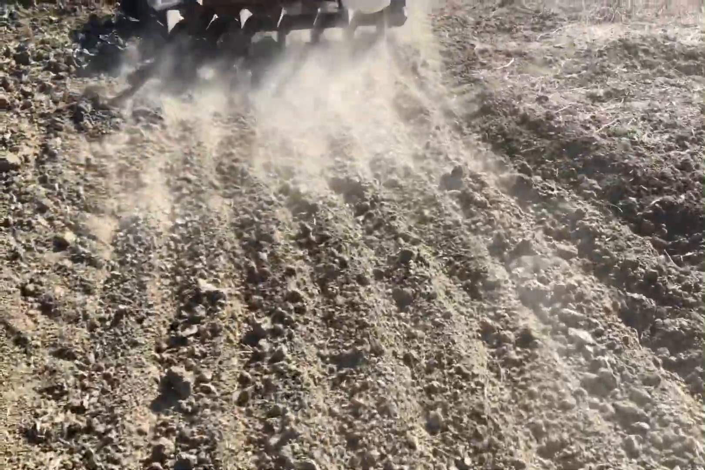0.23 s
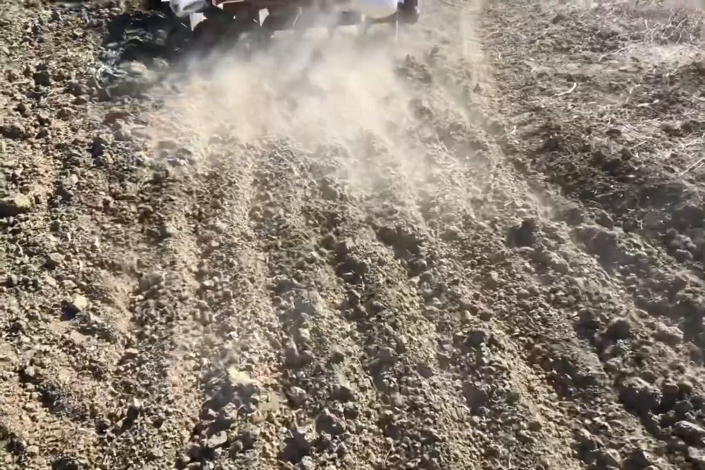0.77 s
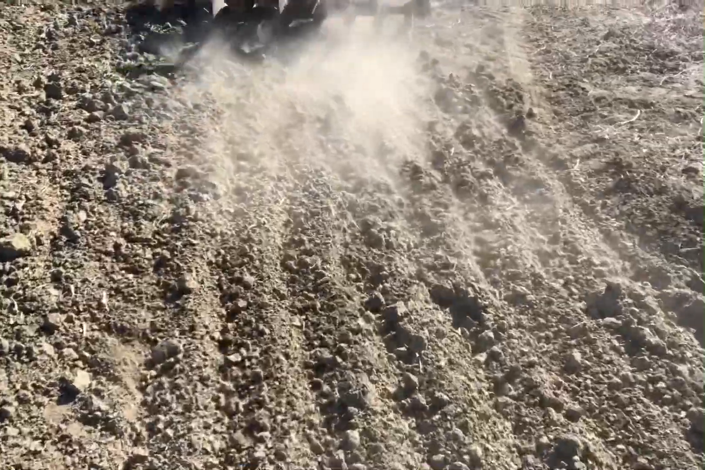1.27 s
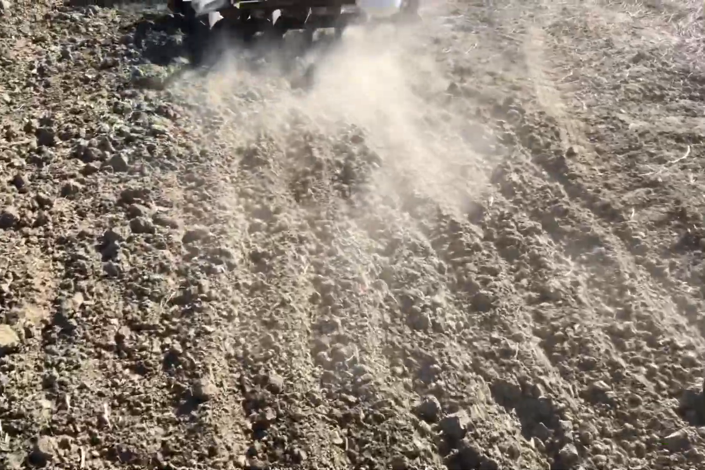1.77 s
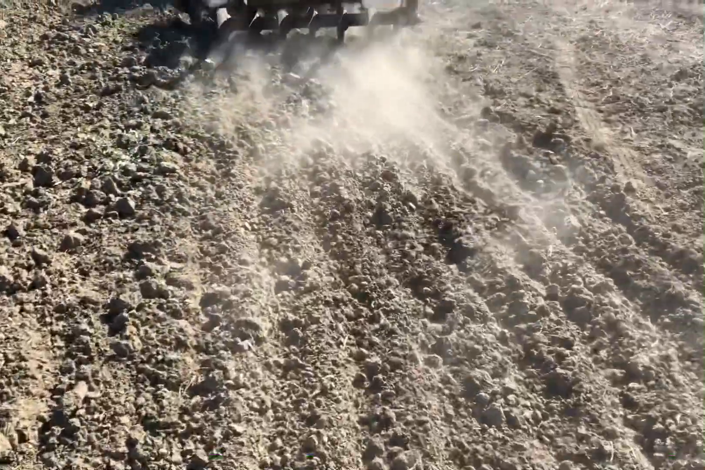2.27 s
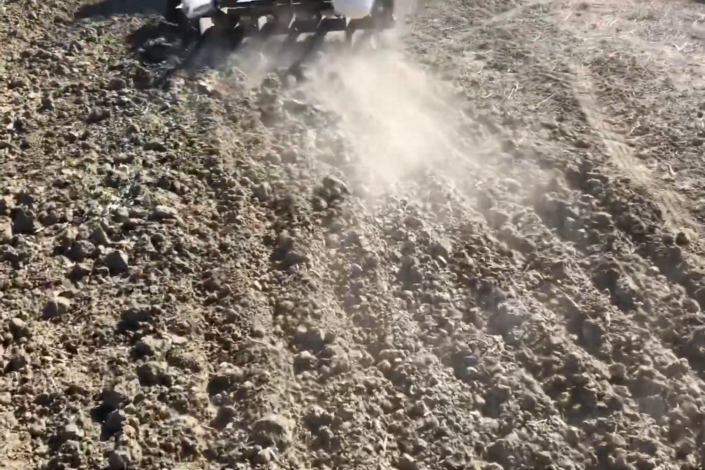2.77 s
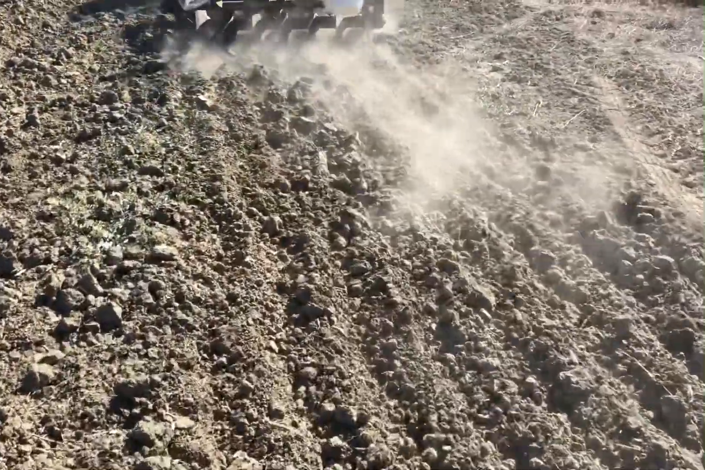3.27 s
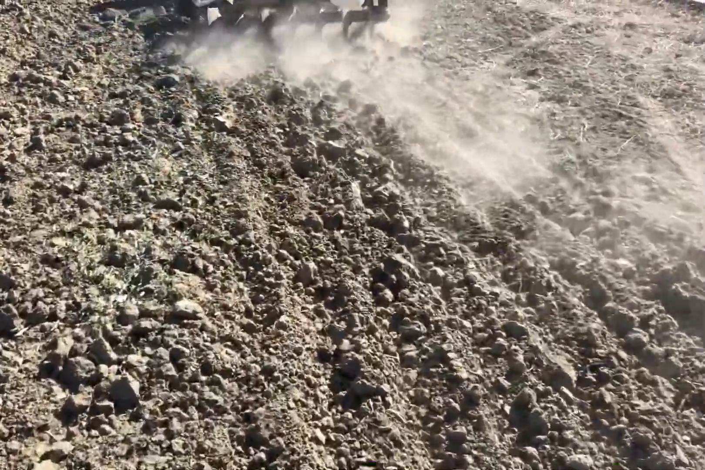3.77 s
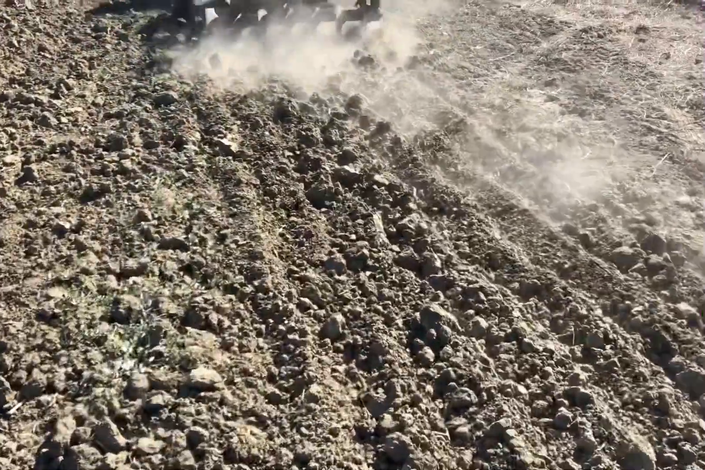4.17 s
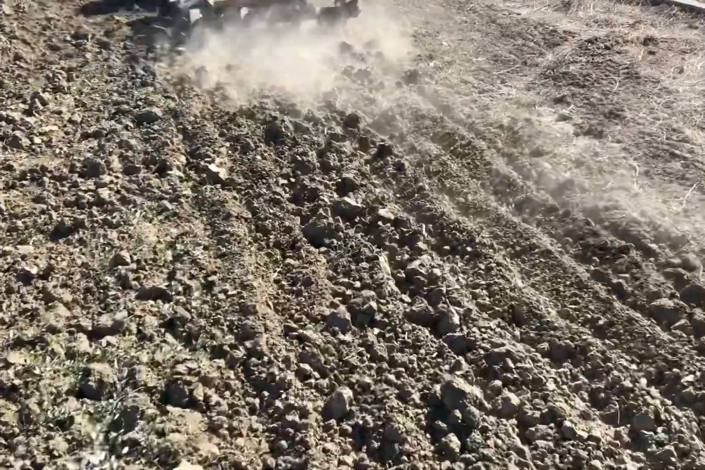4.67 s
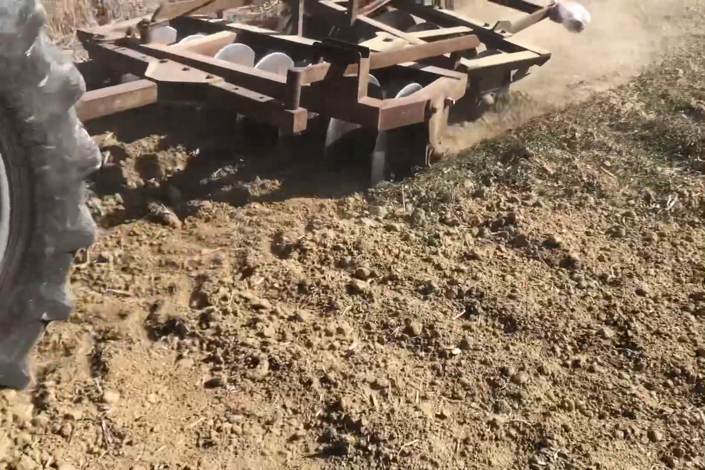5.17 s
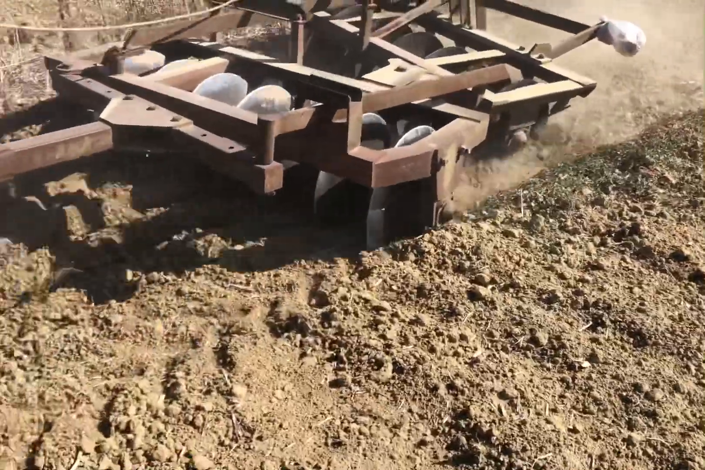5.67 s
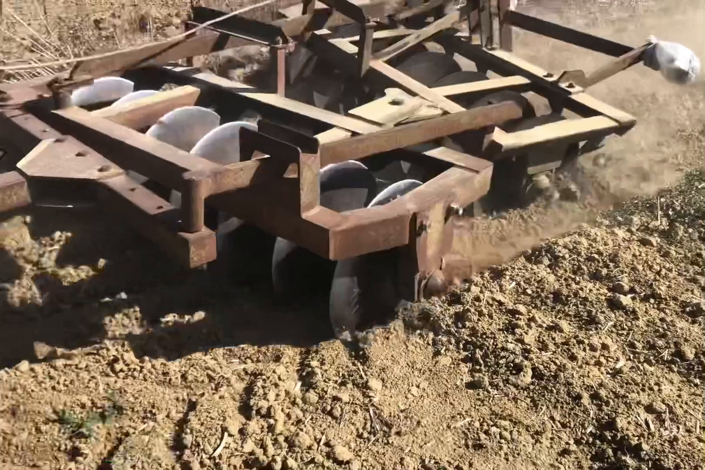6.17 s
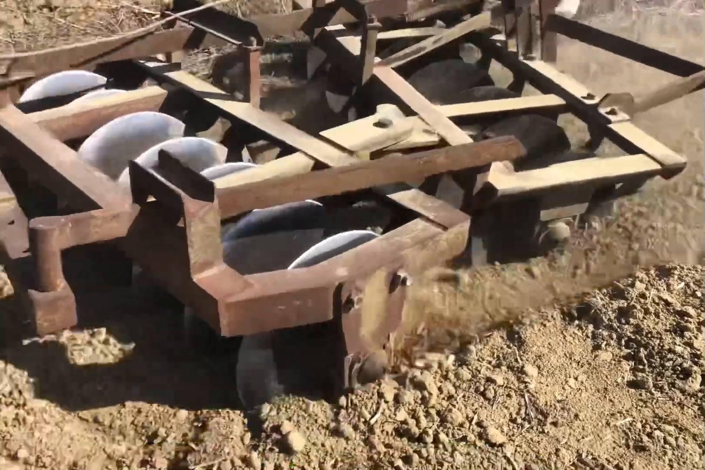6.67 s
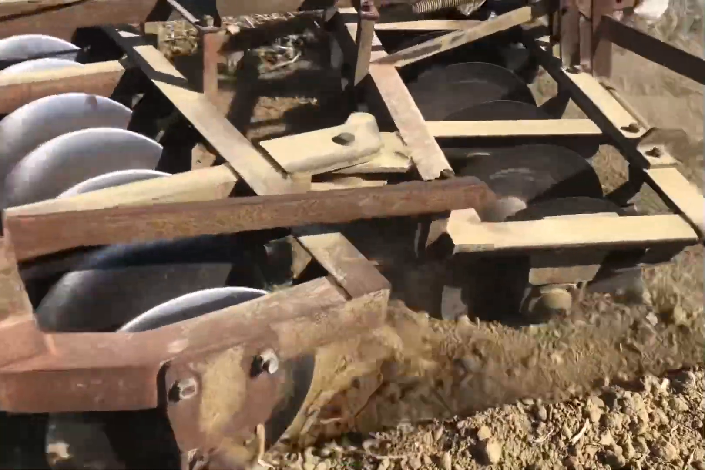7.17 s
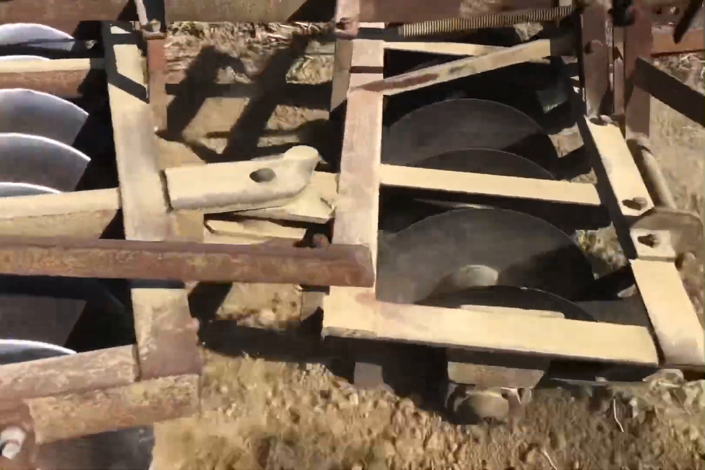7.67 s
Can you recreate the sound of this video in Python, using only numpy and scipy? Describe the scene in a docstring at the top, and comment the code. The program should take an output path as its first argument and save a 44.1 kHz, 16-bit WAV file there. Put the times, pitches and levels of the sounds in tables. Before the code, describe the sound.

Distant tractor drone with crumbling soil cuts to a loud, close engine moving away as its harrow crunches through clods and stones.

```python
"""A dull diesel drone, with soil crumbling and stones knocking on steel: a four-cylinder tractor pulls a
disc harrow through dry clods, heard from far behind. Then we are suddenly on the verge, where the loud
engine clatters, whines and moves off while the harrow rolls up, squeaks and hits a stone.
Exhaust, clatter and gears are locked to the crankshaft; the soil is a spray of tiny cracks,
and each stone sets the discs ringing."""
import sys
import numpy as np
from scipy import signal
from scipy.fft import rfft, irfft, next_fast_len
from scipy.io import wavfile

SR = 44100
rng = np.random.default_rng(int(sys.argv[2]) if len(sys.argv) > 2 else 0)


def materialize(psi):
    """Save the field psi as 16-bit PCM at rate SR to the path in sys.argv[1].

    A 1-D psi becomes a single channel; in a 2-D psi each row is a channel.
    """
    bounded = np.clip(np.atleast_2d(psi).T, -1, 1)
    quanta = np.round(bounded * 32767).astype(np.int16)
    wavfile.write(sys.argv[1], SR, quanta)


N = 349272
TIME = np.arange(N) / SR
CUT_S, CROSSFADE_S = 4.773, 0.016   # the cut from behind the harrow to the verge
ENGINE_PASS_S, PIPE_PASS_S = 4.875, 4.98   # engine and exhaust pipe are nearest the verge
AWAY_DB = 0.27 * (CUT_S / 2 - TIME)   # slow fade as the tractor draws away, heard from behind
LEAVING = np.interp(TIME, [5.6, 6.9], [0, 1])   # morph from the close engine tone to the far one


# EQ of the rushing gas: f/Hz, level/dB
GAS_EQ = [(45, -16), (70, 0.5), (110, -4.5), (160, -4.5), (215, -1), (270, -18.5), (350, -15.5), (500, -32)]
def exhaust(cycle, orders, boom_db, octave_db, rumble_db, gas_db, waver):
    """Four firings a cycle make the boom; unequal cylinders add the tones between, gas a rumble."""
    boom = unit_rms(crank_tones(cycle, orders[:7], waver * .3))
    octave = unit_rms(crank_tones(cycle, orders[7:8], waver * .3))
    upper = unit_rms(crank_tones(cycle, orders[8:], waver))
    puffs = rng.standard_normal(N) * (1 + .5 * np.cos(8 * np.pi * cycle))
    rumble = from_db(-0.5) * upper + from_db(gas_db) * equalise(puffs, GAS_EQ)
    return from_db(boom_db) * boom + from_db(octave_db) * octave + from_db(rumble_db) * rumble


# Exhaust partials from behind: multiple of the cycle rate, relative level/dB
DULL_PARTIALS = [(1, -46), (2, -37), (3, -30), (4, -3), (5, -59), (6, -32), (7, -12), (8, -3), (9, -16.5),
                 (10, -49), (11, -8.5), (12, -17.5), (13, -21.5), (14, -17), (15, -27.5), (16, -21),
                 (17, -21.5), (18, -40), (19, -35), (20, -26)]
def exhaust_behind(cycle, load_db):
    """A distant drone that ducks whenever the load eases."""
    return exhaust(cycle, DULL_PARTIALS, boom_db=-30 + 0.77 * load_db, octave_db=-33 + 0.98 * load_db,
                   rumble_db=-38.5 + 1.1 * load_db + AWAY_DB, gas_db=-1.5, waver=0.21)


# Exhaust partials from the verge, close and then leaving: multiple of the cycle rate, relative level/dB
CLOSE_PARTIALS = [(1, -49), (2, -40), (3, -31), (4, 0), (5, -20), (6, -25), (7, -11.5), (8, -8.5), (9, -18),
                  (10, -11.5), (11, -18), (12, -19.5), (13, -20), (14, -26), (15, -27), (16, -28), (17, -9),
                  (18, -29), (19, -15), (20, -19)]
LEAVING_PARTIALS = [(1, -45), (2, -40), (3, -24), (4, 1), (5, -23), (6, -36), (7, -9.5), (8, -5.5),
                    (9, -18), (10, -17), (11, -5), (12, -9), (13, -29), (14, -29), (15, -27), (16, -21.5),
                    (17, -23.5), (18, -14), (19, -24), (20, -19)]
# Fader for the octave of the firing tone, which drops out and returns: t/s, level/dB
OCTAVE_FADER = [(4.92, -25), (5.05, -40), (5.2, -28), (5.35, -42), (5.5, -43.5), (5.82, -29.5), (6.4, -30),
                (7.65, -30)]
def exhaust_beside(cycle):
    """The pipe booms past, and its partials shift in balance as it moves away."""
    orders = [(order, close_db + LEAVING * (far_db - close_db))
              for (order, close_db), (_, far_db) in zip(CLOSE_PARTIALS, LEAVING_PARTIALS)]
    boom_db = pass_by(PIPE_PASS_S, nearest_db=-14, falloff=1.05)
    rumble_db = pass_by(PIPE_PASS_S, nearest_db=-28.5, falloff=0.39)
    return exhaust(cycle, orders, boom_db, automation(OCTAVE_FADER), rumble_db, gas_db=-2.5, waver=0.14)


# Accent of each cylinder, in firing order: level/dB
CYLINDER_ACCENTS = [-0.18, 0.91, -0.56, 0.082]
def clatter(cycle, looped_share, depth_db):
    """Combustion, valves and injectors: noise that swells at each firing, part looped every cycle."""
    loop = rng.standard_normal(int(TIME[-1] * SR / cycle[-1]))
    looped = loop[(cycle % 1 * len(loop)).astype(int)]
    firing = 4 * cycle
    swell = np.sin(np.pi * (firing % 1) ** 0.66) ** 2
    accent_db = np.array(CYLINDER_ACCENTS)[firing.astype(int) % 4]
    pulse = unit_rms(from_db(swell * (depth_db + accent_db)))
    return blend(rng.standard_normal(N), looped, looped_share) * pulse


# EQ of the distant clatter: f/Hz, level/dB
DULL_CLATTER_EQ = [(180, -28), (300, -8), (337, -15.5), (417, -4), (458, -8), (547, -5), (601, -3.5),
                   (668, -6.5), (1190, -8.5), (1400, -10.5), (1540, -8), (1770, -10), (3730, -27.5),
                   (5000, -31), (6500, -59), (11000, -120)]
# Resonances of the tractor's body: f/Hz, width/Hz, boost/dB
BODY_PEAKS = [(613, 47, 3), (900, 34, 4.5), (1263, 170, 3.5), (1710, 140, -2.5)]
def clatter_behind(cycle):
    """Muffled midrange: engine clatter and breaking clods, coloured by the body."""
    engine = clatter(cycle, looped_share=0.053, depth_db=2.0)
    clods = crumbs(per_s=1200, spread_db=3.8, clump_db=4)
    return equalise(blend(engine, clods, share=0.23), DULL_CLATTER_EQ, BODY_PEAKS, ripple_db=1.2)


# EQ of the close clatter: f/Hz, level/dB
CLOSE_CLATTER_EQ = [(150, -2.5), (250, -4.5), (275, -2.5), (326, -10), (441, -4.5), (549, -6.5),
                    (627, -3.5), (751, -5.5), (1260, -8.5), (1650, -8), (1860, -7), (2200, -13),
                    (2770, -13.5), (3250, -26.5), (4500, -32.5), (5850, -32), (9900, -120)]
# Ringing engine panels: f/Hz, width/Hz, boost/dB
PANEL_PEAKS = [(2710, 110, 2), (3066, 105, 5), (4000, 120, 1.5), (4930, 70, 7), (5440, 240, 5),
               (6300, 99, 0.5), (7060, 340, 1.5)]
def clatter_beside(cycle):
    """Close clatter rings body and panels; more clods join in as the discs come near."""
    engine = clatter(cycle, looped_share=0.19, depth_db=2.0)
    clods = crumbs(per_s=1600, spread_db=2.8, clump_db=3.2)
    clod_share = 0.29 * np.interp(TIME, [5.2, 6.2, TIME[-1]], [.1, .5, .7])
    return equalise(blend(engine, clods, clod_share), CLOSE_CLATTER_EQ, BODY_PEAKS + PANEL_PEAKS, 2.2)


# Gear and pump tones: multiple of the cycle rate, relative level/dB
GEAR_PARTIALS = [(17, -11), (22, -19), (32, -22.5), (38, -21), (40, -22), (44, -23), (56, -26), (60, -18.5),
                 (64, -17.5), (112, -24), (168, -38)]
def whine(cycle):
    """Gears and pumps sing with the crankshaft, softer as the tractor leaves."""
    return from_db(0.5 - 2.7 * LEAVING) * crank_tones(cycle, GEAR_PARTIALS, waver=0.06)


# Modes of the valve cover: f/Hz, level/dB, t60/s
COVER_MODES = [(2820, 10, 0.015), (5200, -12, .025), (5760, -3, .018), (6350, 2.5, .025)]
# EQ of the engine's metallic top end: f/Hz, level/dB
METAL_EQ = [(1940, -25), (3300, -7), (3910, 1), (4610, -5.5), (5530, -2), (7570, -5.5), (10900, -7),
            (15700, -16.5)]
def ticking(cycle):
    """Tappets tick into the valve cover over bright clatter; one is slack and hits harder."""
    metal = equalise(clatter(cycle, looped_share=.15, depth_db=4.5), METAL_EQ, PANEL_PEAKS, 1.9)
    firing = (4 * cycle).astype(int)
    strength_db = np.where(firing % 4 == 1, 0, -7) + 5.3 * rng.uniform(-1, 1, N)
    ticks = np.diff(firing, prepend=0) * from_db(strength_db)
    cover = sum(ring(ticks * from_db(db + 3.0 * np.tanh(drift(30))), hz, t60)
                for hz, db, t60 in COVER_MODES)
    return blend(metal, cover, share=0.18 * (1 - LEAVING))


def crumbs(per_s, spread_db, clump_db):
    """Dry clods break in clumps of tiny cracks of very unequal size."""
    cracks = rng.random(N) < per_s * from_db(clump_db * drift(25)) / SR
    size_db = spread_db * np.minimum(rng.exponential(1, N), 4)
    return cracks * from_db(size_db) * rng.choice([-1, 1], N)


# EQ of the distant soil hiss: f/Hz, level/dB
FAR_SOIL_EQ = [(2060, -2), (3500, -2.5), (5900, -9.5), (8660, -9), (10700, -12), (12400, -16.5),
               (15100, -20), (15700, -17)]
def soil_behind(cycle):
    """Crumbling soil and the top of the clatter make a hiss that swells just before the cut."""
    swell_db = 11.5 * (np.clip(TIME, 4.09, CUT_S) - 4.09)
    engine = clatter(cycle, looped_share=.02, depth_db=3.0)
    hiss = blend(engine, crumbs(per_s=2500, spread_db=3.2, clump_db=3), share=0.29)
    return from_db(-45.5 + AWAY_DB + swell_db) * equalise(hiss, FAR_SOIL_EQ, ripple_db=2.0)


# EQ of the close soil: f/Hz, level/dB
CLOSE_SOIL_EQ = [(1940, -42), (3300, 1.5), (4550, -2.5), (5460, -2.5), (7720, -4.5), (10600, -4.5),
                 (12300, -12), (15700, -11)]
def soil_beside():
    """Dense, steady crumbling under the discs, uncovered as the engine fades."""
    cracks = crumbs(per_s=9000, spread_db=1.8, clump_db=2.5)
    return from_db(-37) * equalise(cracks, CLOSE_SOIL_EQ, ripple_db=3.3)


# Stones and clods hitting the harrow: t/s, relative level/dB, top of the crunch f/Hz
HITS = [(.283, -31, 2000), (.723, -29.5, 4000), (1.111, -31.5, 7500), (1.570, -28.5, 3000),
        (2.076, -29.5, 4000), (2.21, -32, 2800), (2.425, -29.5, 3960), (2.822, -31, 3500),
        (3.832, -34, 2500), (4.023, -32.5, 4400), (4.251, -30.5, 3500), (6.693, -29, 9000),
        (6.928, -21, 3170), (7.714, -14.5, 13000), (7.738, -11, 12100), (7.76, -16.5, 900),
        (7.793, -17, 3100), (7.851, -14, 4050), (7.86, -16.5, 1110)]
# Modes of the discs and frame: f/Hz, level/dB, t60/s
STEEL_MODES = [(629, 6.5, 0.052), (1320, 2.5, 0.18), (1940, 0, 0.23), (2460, -3.5, 0.13), (3100, -5, 0.11),
               (3320, -3, 0.14), (3860, -6, 0.24), (4480, -3, 0.23), (6000, -4, 0.1), (6820, 1, .14),
               (7800, -3, .12), (11000, -9, .16)]
def knocks(graze_s=.006, graze_db=-2.5, crunch_t60_s=0.078, spread_db=3.5):
    """A stone grazes a disc, strikes it full on and sets it ringing; soft clods sound duller."""
    out = np.zeros(N)
    for start_s, db, top_hz in HITS:
        start = int(start_s * SR)
        age = TIME[:min(N - start, SR // 4)]
        band = signal.butter(4, [250 + 0.05 * top_hz, top_hz], "band", fs=SR, output="sos")
        grit = unit_rms(signal.sosfilt(band, rng.standard_normal(len(age))))
        attack = 1 - np.exp(-age / 0.0013)
        grazing = age < graze_s
        decay_db = 60 * np.where(grazing, age, age - graze_s) / crunch_t60_s
        crunch = grit * attack * from_db(db + graze_db * grazing - decay_db)
        # each stone meets another spot and favours other modes
        steel = sum(from_db(mode_db + spread_db * rng.uniform(-0.73, 1)) * ring(crunch, hz, t60)
                    for hz, mode_db, t60 in STEEL_MODES)
        out[start:start + len(age)] += from_db(-4.5) * crunch + from_db(-47) * steel
    return out


def rattle(per_s):
    """Loose harrow joints touch at random; the contact chokes the steel's lower modes."""
    touches = (rng.random(N) < per_s / SR) * rng.uniform(0.23, 1, N)
    return unit_rms(sum(ring(touches * rng.standard_normal(N) * from_db(db) / hz, hz, t60 * 0.13)
                        for hz, db, t60 in STEEL_MODES[:7]))


def thump(at_s=5.725):
    """A heavy, quickly damped jolt of the drawbar."""
    click = np.zeros(N)
    click[int(at_s * SR)] = from_db(-7.5)
    return (ring(click, hz=172, t60=0.104) - from_db(-10) * ring(click, hz=250, t60=0.12)
            + from_db(-6) * ring(click, hz=363, t60=0.1))


# Bearing squeaks: peak t/s, level/dB, length/s
SQUEAK_CUES = [(1.25, -59, .05), (2.81, -50, .03), (6.025, -34, .036), (6.945, -43, .04),
               (7.062, -46, .025), (7.227, -40, .016), (7.352, -45, .018), (7.44, -46, .02),
               (7.832, -41, 0.046)]
def squeaks(pitch_hz=10300):
    """A dry disc bearing sticks and slips in short, thin, unsteady whistles."""
    out = np.zeros(N)
    wobble = np.cumsum(45 * drift(120)) / SR
    whistle = np.sqrt(2) * np.sin(2 * np.pi * (pitch_hz * TIME + wobble))
    for peak_s, db, length_s in SQUEAK_CUES:
        near = np.abs(TIME - peak_s) < 2 * length_s
        swell = np.exp(-2 * ((TIME[near] - peak_s) / length_s) ** 2)
        out[near] += from_db(db) * swell * whistle[near]
    return out


def crank_tones(cycle, orders, waver):
    """Tones locked to the crankshaft, each wavering a little in strength and phase."""
    out = np.zeros(N)
    for order, db in orders:
        phase = 2 * np.pi * (order * cycle + rng.random()) + waver * drift(1.2)
        out += from_db(db) * (1 + waver * drift(3.7)) * np.sqrt(2) * np.sin(phase)
    return out


def pass_by(nearest_s, nearest_db, falloff, speed_m_per_s=1.906, gap_m=1.427):
    """Level in dB of a source driving straight past; gain falls as distance to the power falloff."""
    distance_m = np.hypot(gap_m, speed_m_per_s * (TIME - nearest_s))
    return nearest_db - 20 * falloff * np.log10(distance_m / gap_m)


def equalise(x, curve, peaks=(), ripple_db=0):
    """An EQ curve with steep skirts, resonant peaks and a ripple of many small modes; rms 1."""
    size = next_fast_len(N + 4096)
    hz = np.maximum(np.arange(size // 2 + 1) * SR / size, 1)
    points_hz, levels_db = np.transpose(curve)
    octaves_outside = np.abs(np.log2(hz / np.clip(hz, points_hz[0], points_hz[-1])))
    db = np.interp(np.log(hz), np.log(points_hz), levels_db) - 36 * octaves_outside
    for centre_hz, width_hz, boost_db in peaks:
        db += boost_db / (1 + (2 * (hz - centre_hz) / width_hz) ** 2)
    modes_hz = np.arange(1500, SR / 2, 45)
    db += ripple_db * np.interp(hz, modes_hz, rng.standard_normal(len(modes_hz)), left=0)
    return unit_rms(irfft(rfft(x, size) * from_db(db), size)[:N])


def ring(x, hz, t60):
    """One mode: a unit click starts a decaying sine of height 1."""
    radius, angle = from_db(-60 / (t60 * SR)), 2 * np.pi * hz / SR
    return signal.lfilter([0, np.sin(angle)], [1, -2 * radius * np.cos(angle), radius ** 2], x + 1e-18)


def drift(rate):
    """Smooth random modulation that changes about rate times a second; rms 1."""
    pole = np.exp(-80 * np.pi * rate / SR)
    slow = signal.lfilter([1], [1, -2 * pole, pole ** 2], rng.standard_normal(N // 40 + 2002))[2000:]
    return np.interp(np.arange(N) / 40, np.arange(len(slow)), unit_rms(slow))


def blend(a, b, share):
    """Equal-power mix; share is b's part of the power."""
    return np.sqrt(1 - share) * unit_rms(a) + np.sqrt(share) * unit_rms(b)


def automation(points):
    """Straight ramps between (time, value) points."""
    return np.interp(TIME, *np.transpose(points))


def from_db(db):
    """Decibels to gain."""
    return 10 ** (np.asarray(db) / 20)


def unit_rms(x):
    """Scale to unit power."""
    return x / np.sqrt(np.mean(x ** 2) + 1e-20)


def behind(cycle, load_db):
    """The far mix: dull engine, faint rattle, soil on top."""
    clatter_db = -37.5 + AWAY_DB + 0.83 * drift(3.2)
    drone = exhaust_behind(cycle, load_db)
    machine = clatter_behind(cycle) + from_db(-19.5) * rattle(per_s=13)
    return drone + from_db(clatter_db) * machine + soil_behind(cycle)


def beside(cycle):
    """The verge mix: the ticking fades fastest as the engine passes, and the soil stays."""
    clatter_db = pass_by(ENGINE_PASS_S, nearest_db=-18.5, falloff=0.91)
    ticking_db = pass_by(ENGINE_PASS_S, nearest_db=-25.5, falloff=2.07)
    drone = exhaust_beside(cycle)
    machine = clatter_beside(cycle) + whine(cycle) + from_db(-17.5 + 1.6 * LEAVING) * rattle(per_s=30)
    return drone + from_db(clatter_db) * machine + from_db(ticking_db) * ticking(cycle) + soil_beside()


# Engine load from behind, easing briefly a few times: t/s, level/dB against the usual load
ENGINE_LOAD = [(0.03, -5), (0.12, -1), (0.22, -5.5), (0.32, 0), (0.46, .5), (0.56, -6), (0.7, -1),
               (1.24, 1), (1.35, -5), (1.47, 1), (2.5, 0), (3.1, -.5), (3.64, 0), (3.77, -4.5), (3.9, -6.5),
               (4.04, -.5), (4.72, 0)]
# Engine speed past the verge: t/s, speed/rpm
VERGE_RPM = [(4.9, 1960), (5.25, 1945), (5.8, 1943), (6.0, 1958), (6.25, 1947), (7.5, 1948), (7.8, 1932)]
def scene():
    """One tractor and harrow, heard from behind and then from the verge."""
    on_verge = np.clip((TIME - CUT_S) / CROSSFADE_S, 0, 1)
    load_db = automation(ENGINE_LOAD)
    behind_rpm = 1881 - 2.5 * load_db   # the governed engine speeds up when its load eases
    hunting_rpm = 4.5 * drift(1.5)
    rpm = (1 - on_verge) * behind_rpm + on_verge * automation(VERGE_RPM) + hunting_rpm
    cycle = np.cumsum(rpm / 120) / SR   # two turns make one four-stroke cycle
    tractor = (1 - on_verge) * behind(cycle, load_db) + on_verge * beside(cycle)
    return (tractor + knocks() + squeaks() + thump())[None]


def record(dry):
    """A low cut on the deepest bass and a steep high cut."""
    thin = signal.sosfilt(signal.butter(2, 28, "high", fs=SR, output="sos"), dry)
    return signal.sosfilt(signal.ellip(12, .1, 90, 15850, fs=SR, output="sos"), thin)


dry = scene()
out = record(dry)
materialize(out)
```